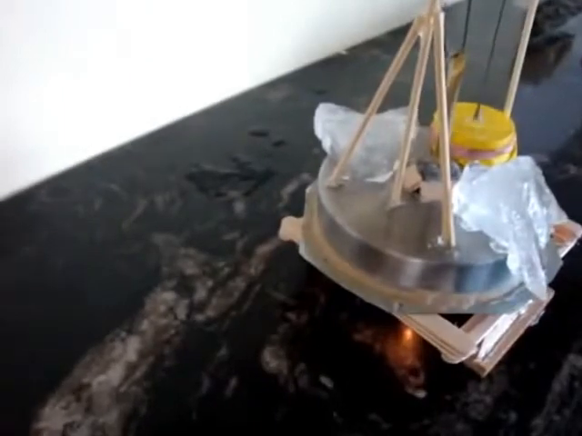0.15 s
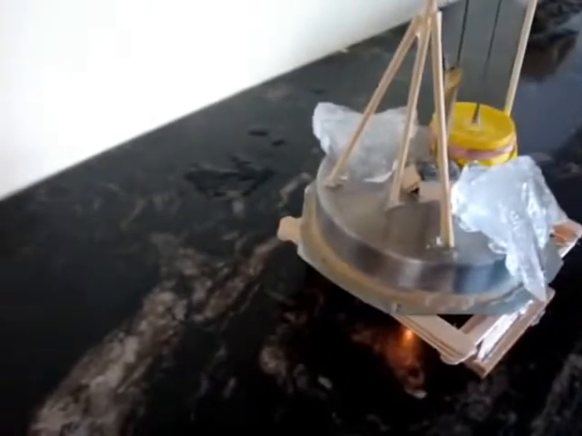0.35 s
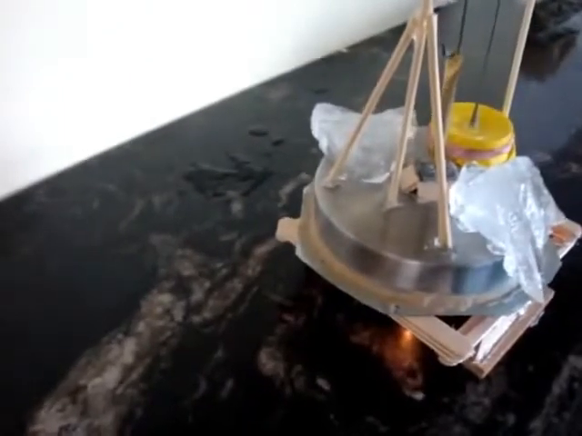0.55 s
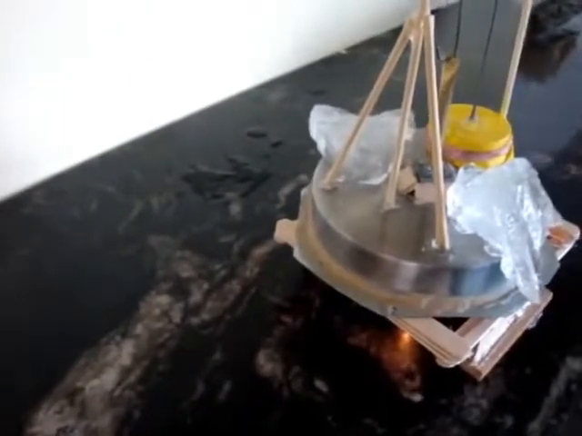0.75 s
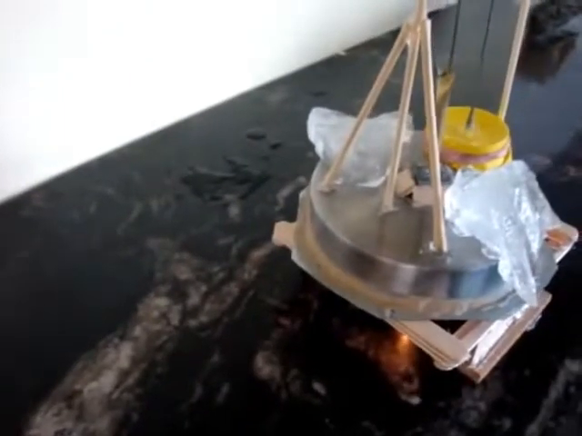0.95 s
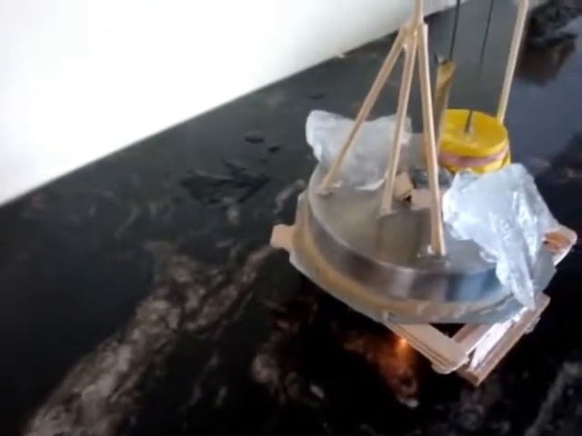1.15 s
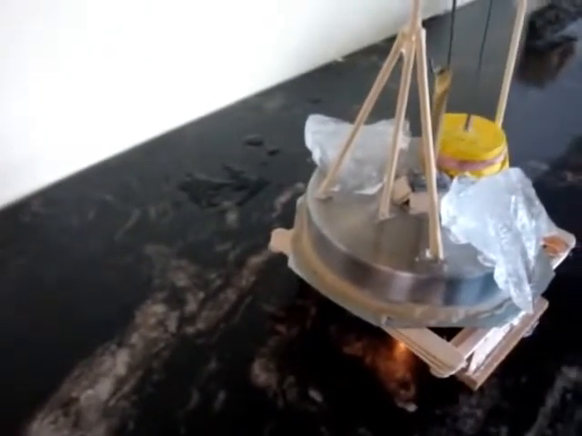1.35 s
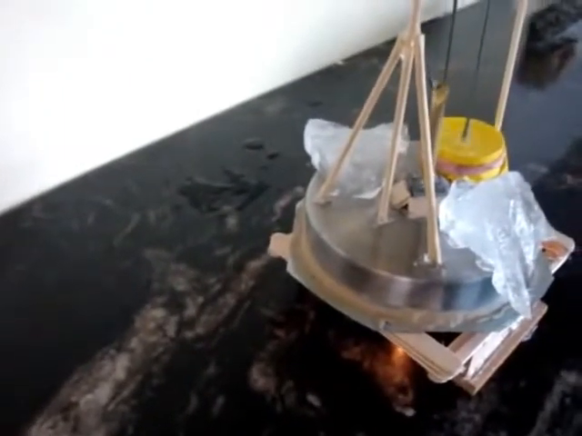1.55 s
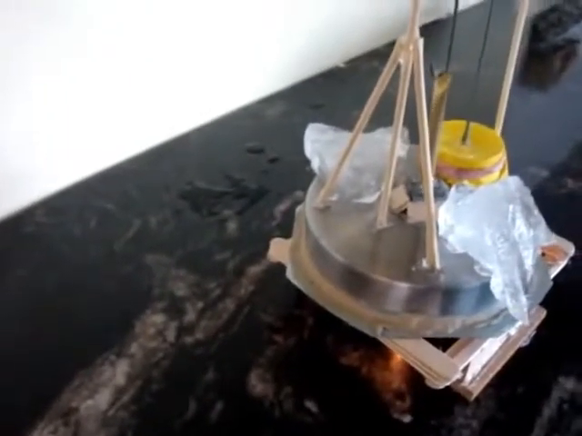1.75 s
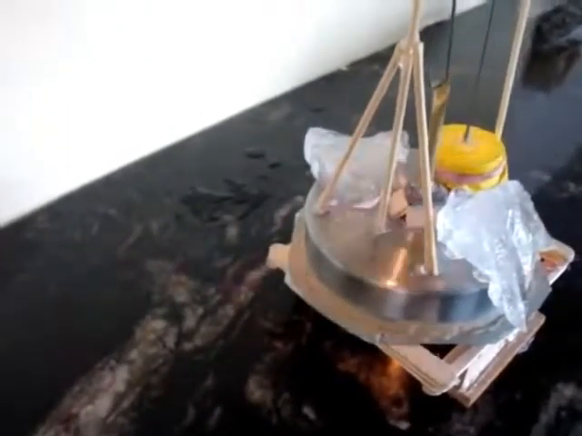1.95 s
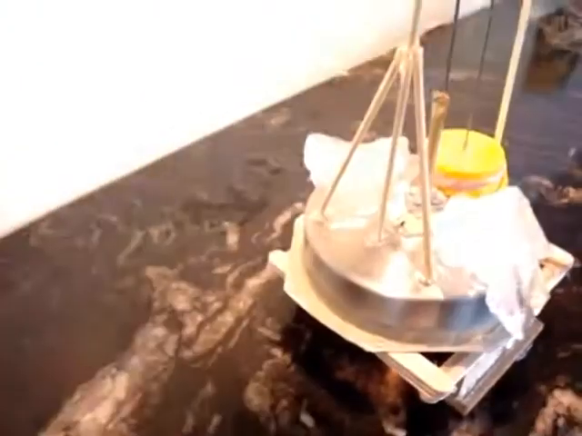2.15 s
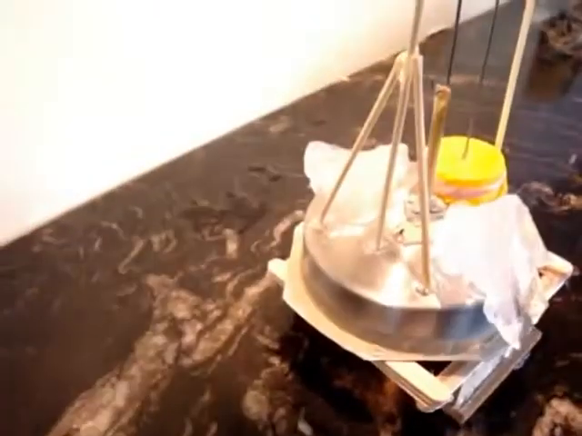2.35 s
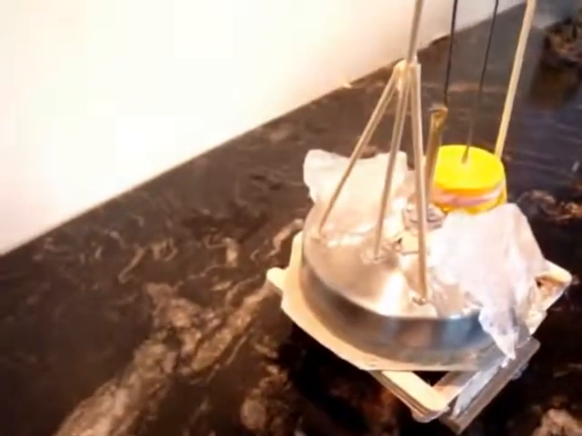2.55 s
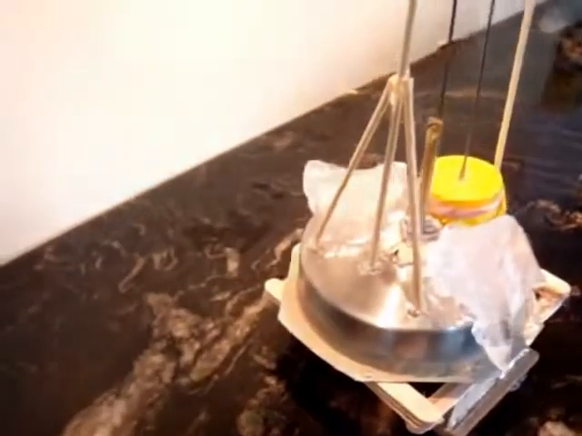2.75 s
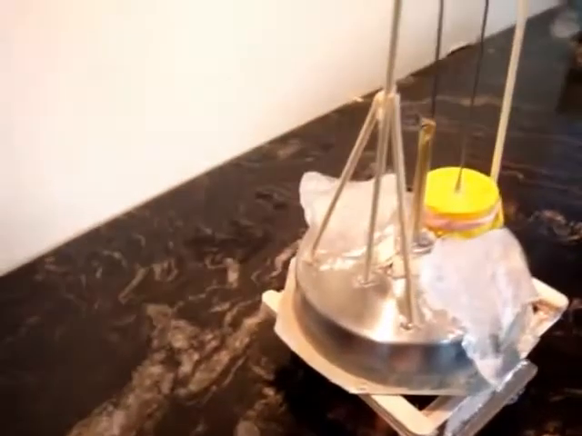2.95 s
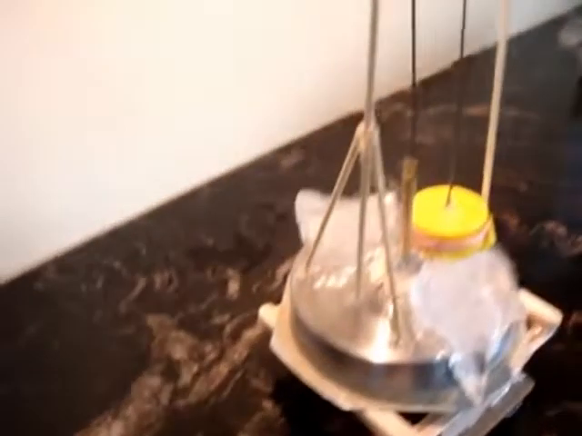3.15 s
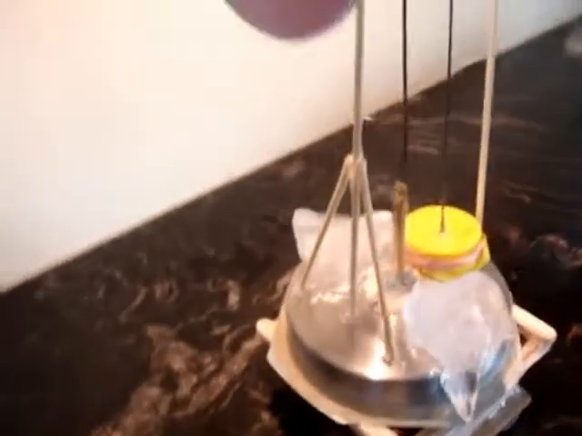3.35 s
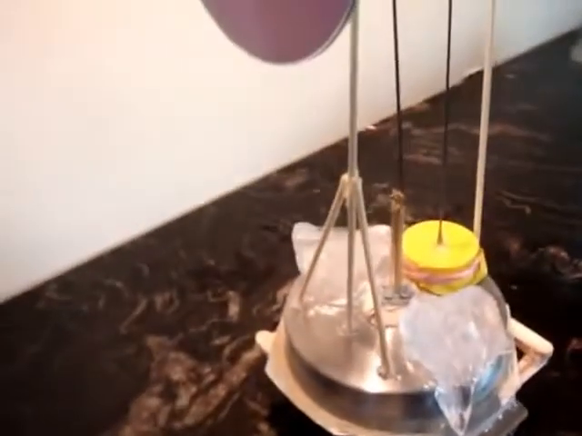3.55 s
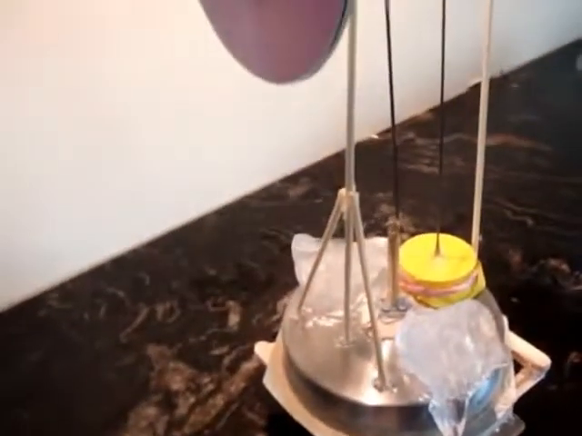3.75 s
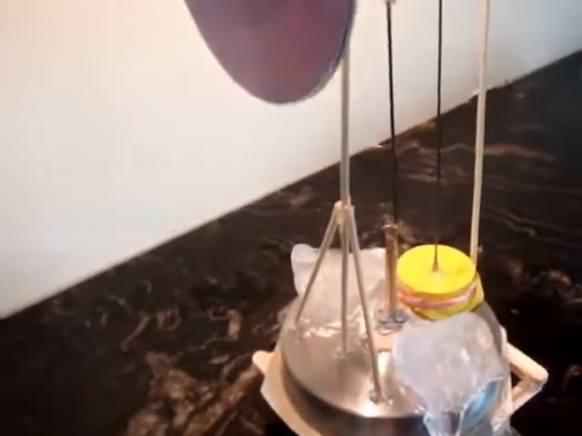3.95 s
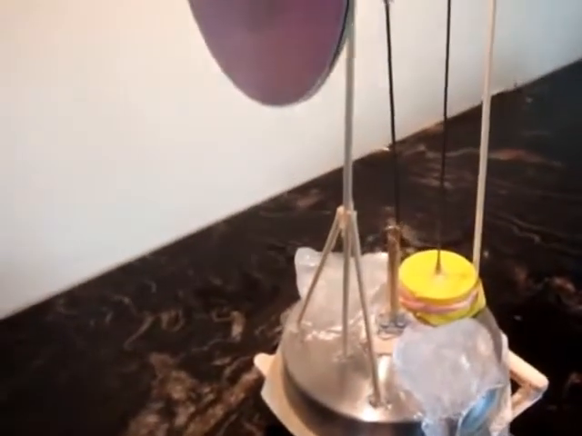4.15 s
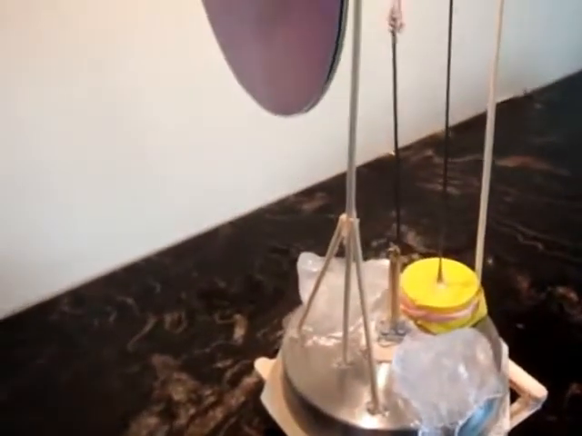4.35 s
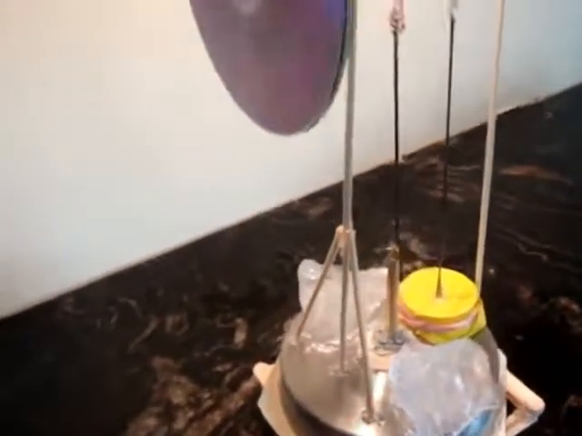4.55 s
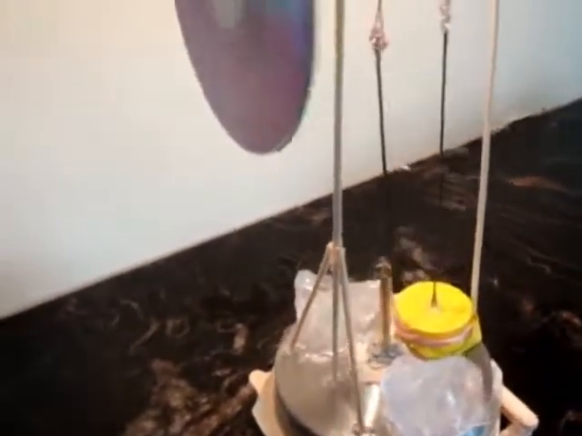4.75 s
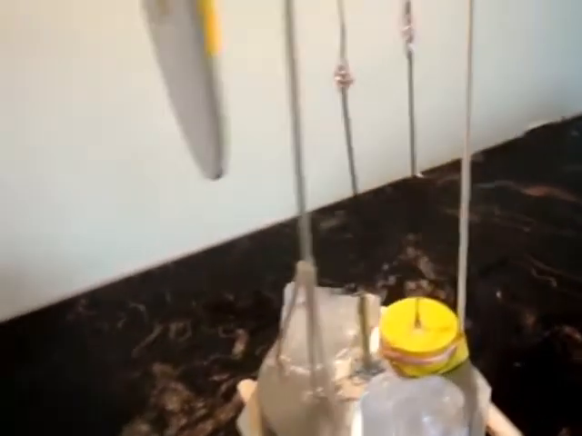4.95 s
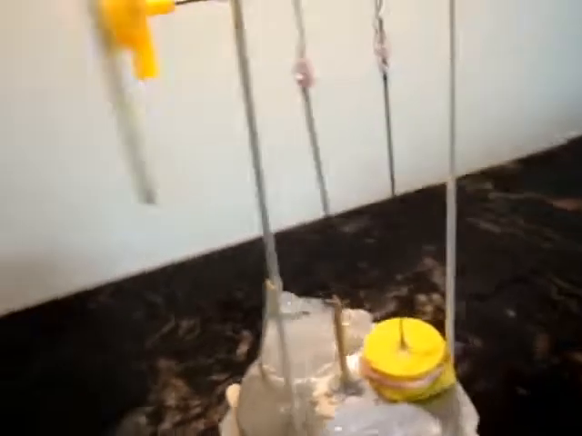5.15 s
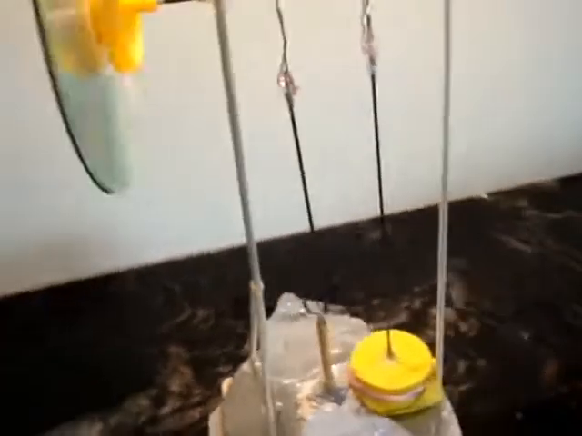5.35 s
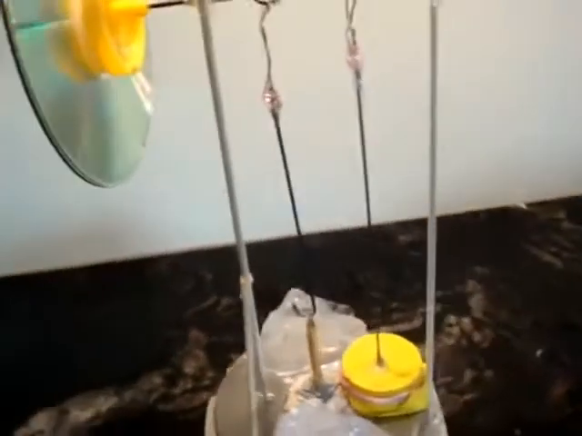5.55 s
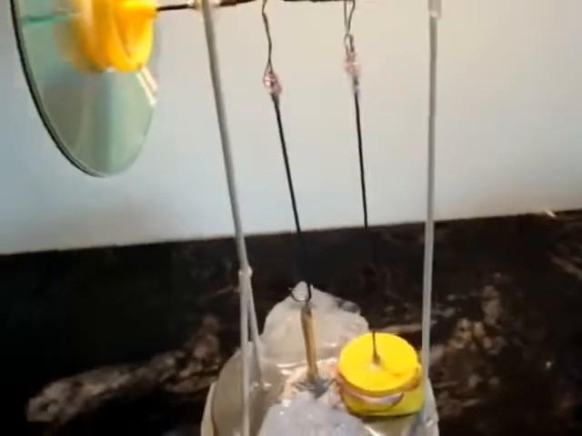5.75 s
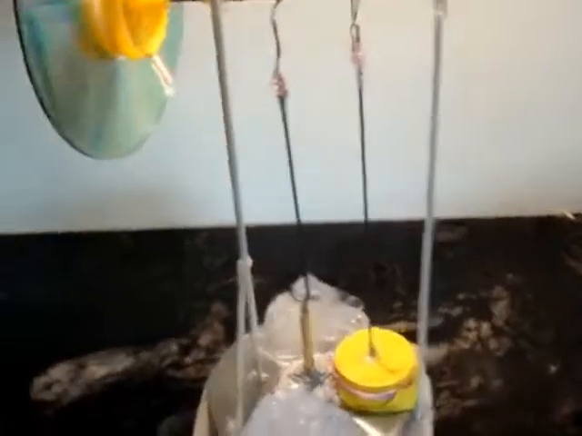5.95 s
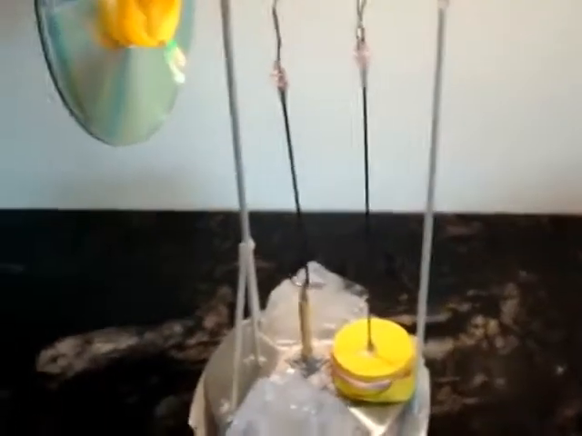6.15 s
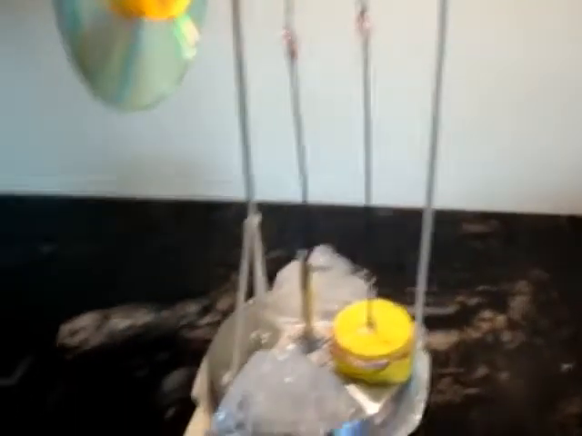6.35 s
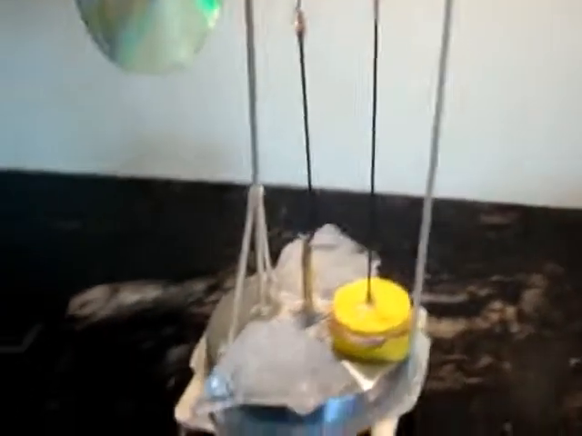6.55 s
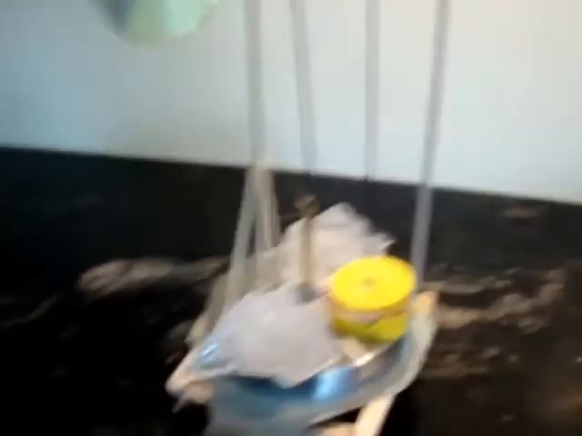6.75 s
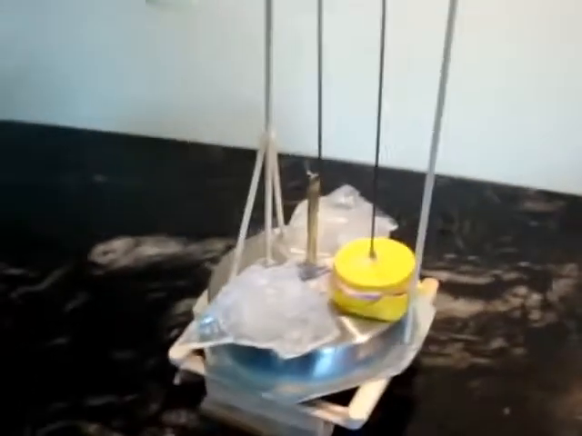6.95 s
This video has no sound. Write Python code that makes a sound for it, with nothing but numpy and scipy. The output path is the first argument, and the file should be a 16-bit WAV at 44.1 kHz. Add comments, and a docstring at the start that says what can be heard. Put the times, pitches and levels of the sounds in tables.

```python
"""Faint hiss and a fading low drone come first, then light touches on a tin can, rod chatter and a tick.
A small home-made hot-air engine turns on a stone counter in a quiet room: each turn the wire rods tick
in their loops and the displacer knocks the can, hard below and softly above. Once a light switch snaps.
Struck parts are sums of dying modes; rubbing, scrape, rattle and floor are shaped noise; the hum is
wavering sines; a sparse-tap room adds the echo."""
import sys
import numpy as np
from scipy import signal
from scipy.io import wavfile
from scipy.ndimage import uniform_filter1d

SR = 44100
rng = np.random.default_rng(int(sys.argv[2]) if len(sys.argv) > 2 else 0)


def put_to_file(sound):
    """Save the sound as 16-bit audio at rate SR, in the file named by the first command-line argument."""
    columns = np.atleast_2d(sound).T  # one column per channel
    safe = np.clip(columns, -1, 1)
    whole_steps = np.round(safe * 32767)
    wavfile.write(sys.argv[1], SR, whole_steps.astype(np.int16))


def amplitude_ratio(level_db):
    """Convert a level in decibels to the matching linear amplitude (field) ratio."""
    exponent = np.asarray(level_db, float) / 20
    return 10 ** exponent


N = 308700  # 7 s

# displacer landing on the can floor: start_s, level_db, brightness_db_per_octave
KNOCKS = [(0.532, -25.5, 0), (1.119, -28.5, 0.5), (1.7048, -28, -1.5), (2.289, -28, 1), (2.864, -26, -1),
          (3.4328, -28.5, -1.5), (3.9977, -29, 0), (4.5577, -27.5, -3), (5.116, -29, -2), (5.673, -30, 1),
          (6.233, -28.5, -0.5), (6.79, -30.5, 0.5)]
SNAP_S = 2.0016


def evened(x):
    """Scales to rms 1."""
    return x / np.sqrt(np.mean(x ** 2) + 1e-20)


def read(points, hz):
    """Interpolates (Hz, value) points on a log frequency axis."""
    point_hz, value = np.transpose(points)
    return np.interp(np.log(hz + 1), np.log(point_hz + 1), value)


def add(mix, start_s, sound):
    """Mixes a sound in at start_s, cut at the end of the mix."""
    part = mix[round(start_s * SR):][:len(sound)]
    part += sound[:len(part)]


def ring(hz, db, t60_s, rise_s):
    """Sum of exponentially dying modes with a short rise, peak 1."""
    t = np.arange(SR // 5)[:, None] / SR
    envelope = amplitude_ratio(db - 60 * t / np.maximum(t60_s, .002)) * (1 - np.exp(-t / rise_s))
    total = (envelope * np.sin(2 * np.pi * hz * t)).sum(1)
    return total / abs(total).max()


def noise(colour, patchy_db):
    """Noise of a given spectrum whose level drifts in small time-frequency patches, rms 1."""
    frames, hz = N // 256 + 5, np.fft.rfftfreq(1024, 1 / SR)
    real, imag, patches = rng.standard_normal((frames, 513, 3)).T
    patches = uniform_filter1d(patches, size=10, axis=0)  # across frequency
    patches = evened(uniform_filter1d(patches, size=8, axis=1))  # across time
    z = (real + 1j * imag) * amplitude_ratio(read(colour, hz)[:, None] + patchy_db * patches)
    return evened(signal.istft(z, nperseg=1024, noverlap=768)[1][:N])


def can():
    """Knocks and touches ring the same can modes with other weights; no two blows land quite alike."""
    # can modes: mode_hz, t60_s, knock_db, touch_db
    can_modes = [(386, 0.052, -5, -8), (427, 0.11, -12, -19), (630, 0.038, -10, 9.5), (673, 0.026, 9, -23),
                 (759, 0.11, -19, 2), (988.5, 0.057, -1, 6), (1008, .25, -30, 0), (1272, 0.032, 0.5, -7),
                 (1464, 0.054, -10.5, 3.5), (1735, 0.024, -5, 5.5), (1888, 0.018, -4, 10),
                 (2635, 0.018, -20, -38)]
    # lighter touches: start_s, level_db, favoured_hz
    taps = [(0.254, -36.5, 990), (0.442, -39.5, 595), (0.577, -48, 627), (0.8395, -33.5, 980),
            (1.026, -39, 622), (1.065, -42, 646), (1.158, -44, 620), (1.361, -46, 797), (1.4295, -35, 760),
            (1.616, -39, 600), (2.2, -38.5, 680), (2.509, -50, 1040), (2.593, -34.5, 940),
            (2.784, -41.5, 610), (3.165, -39.5, 754), (3.383, -41, 1280), (3.476, -45, 974),
            (3.732, -38.5, 750), (3.919, -43, 568), (4.2925, -37.5, 810), (4.479, -42.5, 706),
            (4.852, -37, 760), (5.409, -37.5, 754), (5.622, -36.5, 1360), (5.73, -46, 626),
            (5.967, -45.5, 730), (6.153, -40.5, 778), (6.5275, -38.5, 705), (6.716, -39.5, 655)]
    # contacts as the displacer settles: delay_s, level_db
    settle = [(0, 1), (.003, -10.5), (.0078, -10), (.017, -25)]
    mode_shift, settle_spread = .015, .24  # shares by which mode pitch and contact delay vary
    thud_db, thud_top_hz, thud_t60_s = -11, 1700, .04
    firm_tap_db, focus_per_db = -34, 2.5  # softer taps fall off (dB per octave) around favoured_hz

    out = np.zeros(N)
    hz, t60_s, knock_db, touch_db = np.transpose(can_modes)
    dull = signal.butter(4, [350, thud_top_hz], "band", fs=SR, output="sos")
    t = np.arange(2000) / SR
    for start_s, level_db, tilt in KNOCKS:
        weight, shift = rng.standard_normal((2, len(hz)))
        knock_hz = hz * (1 + mode_shift * shift)
        for delay_s, contact_db in settle:
            spot = rng.standard_normal(len(hz))  # each contact hits another spot
            colour_db = knock_db + tilt * np.log2(hz / 700) + 0.39 * weight + 1.5 * spot
            blow = ring(knock_hz, colour_db, t60_s, 0.0009)
            varied_s = delay_s * (1 + settle_spread * np.tanh(spot[0]))
            add(out, start_s + varied_s, -amplitude_ratio(level_db + contact_db) * blow)
        thud = signal.sosfilt(dull, rng.standard_normal(len(t))) * amplitude_ratio(-60 * t / thud_t60_s)
        add(out, start_s, amplitude_ratio(level_db + thud_db) * thud / abs(thud).max())
    for start_s, level_db, favoured_hz in taps:
        focus = focus_per_db * max(firm_tap_db - level_db, 0)
        chance = rng.standard_normal(len(hz))
        colour_db = touch_db - focus * abs(np.log2(hz / favoured_hz)) + 2.5 * chance
        add(out, start_s - .001, amplitude_ratio(level_db) * ring(hz, colour_db, t60_s, 0.0014))
    return out


def rods():
    """Short dry clicks with a rebound; bursts of tiny uneven contacts, which ring on only in a squeak."""
    # rods clicking in their loops: start_s, level_db, main_hz, rebound_db
    ticks = [(0.4775, -25.5, 3110, -12), (1.065, -28.5, 3070, -9), (1.6523, -25.5, 3130, -6),
             (2.2338, -28.5, 3110, -10), (2.804, -28, 2990, -19), (2.8132, -31, 3070, -10),
             (3.378, -30, 3180, -9), (3.945, -29, 3160, -9), (4.5073, -29, 3170, -9),
             (5.064, -28.5, 3230, -6), (5.6226, -32, 3190, -1), (6.1821, -31.5, 3230, -4),
             (6.737, -33.5, 3120, 1)]
    # rod modes besides the main ring: mode_hz, t60_s, level_db
    rod_modes = [(1350, 0.011, -12), (1830, 0.012, -5), (2250, 0.011, -8), (2800, .011, -6),
                 (3500, 0.011, -6), (3950, 0.009, -12), (4800, 0.006, -18), (5700, .005, -20)]
    # chatter as the slack runs out: start_s, peak_db, main_hz
    chatters = [(0.3955, -36.5, 3300), (0.4412, -40, 3400), (0.463, -39, 3220), (0.98, -40, 3500),
                (1.023, -41, 2240), (1.053, -41, 3100), (1.0993, -42, 2550), (1.354, -39, 2870),
                (1.615, -38, 3800), (1.626, -37, 2100), (1.826, -39.5, 2060), (2.195, -44, 2080),
                (2.2205, -41, 2960), (2.7915, -36.5, 3140), (3.3647, -43, 3170), (3.917, -39, 3600),
                (3.925, -37, 3110), (3.931, -38, 1900), (4.478, -40, 3130), (4.485, -38, 2000),
                (5.5916, -43, 3700), (6.215, -44, 3790), (6.529, -42, 3310), (6.7115, -39, 2770),
                (6.723, -38.5, 4200), (6.745, -40, 3000)]
    # brief squeak of a rod in its loop: start_s, peak_db, main_hz
    squeaks = [(6.1545, -38, 3730)]
    mode_shift, rebound_s, rebound_spread = .03, .0037, .039  # shift and spread are shares

    out = np.zeros(N)
    hz, t60_s, weight_db = np.transpose(rod_modes)
    for start_s, level_db, main_hz, rebound_db in ticks:
        chance, shift = rng.standard_normal((2, len(hz)))
        click_hz = np.r_[main_hz, hz * (1 + mode_shift * shift)]
        click_db = np.r_[0, weight_db + 2.5 * chance]
        click = ring(click_hz, click_db, np.r_[.011, t60_s], .0005)
        add(out, start_s, amplitude_ratio(level_db) * click)
        varied_s = rebound_s * (1 + rebound_spread * shift[0])
        add(out, start_s + varied_s, amplitude_ratio(level_db + rebound_db) * click)
    t = np.arange(2000) / SR
    stroke = np.exp(-(t / .005) ** 2)
    for table, main_db, main_t60_s in ((chatters, 0, .004), (squeaks, 12, .012)):
        for start_s, peak_db, main_hz in table:
            strength, chance = rng.standard_normal((2, len(t)))
            contacts = strength * (chance > 1.2) * stroke
            contacts[0] = 2  # a firm first contact
            contact = ring(np.r_[main_hz, hz], np.r_[main_db, .35 * weight_db],
                           np.r_[main_t60_s, .5 * t60_s], 0.0002)
            burst = signal.fftconvolve(contacts, contact)
            add(out, start_s, amplitude_ratio(peak_db) * burst / abs(burst).max())
    return out


def rubbing():
    """Grainy friction of the rods, its strength following the crank angle between knocks."""
    # rubbing through one turn: turn_share_after_knock, level_db
    rub = [(0, -62), (.15, -66), (.4, -72), (.55, -68), (.7, -68), (.85, -61), (.93, -64), (1, -64)]
    # rubbing spectrum: colour_hz, density_db_per_hz (relative)
    rub_colour = [(200, -43), (600, -23.5), (1200, -25), (2000, -18), (3200, -4), (5000, -5.5),
                  (10000, -12)]
    knock_s = np.transpose(KNOCKS)[0]
    # one more turn at either end
    knock_s = np.r_[2 * knock_s[0] - knock_s[1], knock_s, 2 * knock_s[-1] - knock_s[-2]]
    angle = np.interp(np.arange(N) / SR, knock_s, np.arange(len(knock_s))) % 1
    grain_db = 2.5 * evened(uniform_filter1d(rng.standard_normal(N), size=300))
    return amplitude_ratio(np.interp(angle, *np.transpose(rub)) + grain_db) * noise(rub_colour, 3.0)


def scrape():
    """Something slides on the can: uneven slips excite a few resonances."""
    # resonances: ring_hz, width_hz, level_db
    scrape_ring = [(780, 78, 4), (948, 8.9, -14), (1060, 63, 0.5), (1170, 43, -4), (1880, 160, -23)]
    start_s, hold_s, slips_per_s = 5.128, .048, 1200
    level_db, release_db_per_s = -43, -500
    slips = rng.standard_normal(N) * (rng.random(N) < slips_per_s / SR)
    hz, width_hz, db = np.transpose(scrape_ring)
    since_s = np.arange(N) / SR - start_s
    stroke_db = level_db + release_db_per_s * np.maximum(since_s - hold_s, 0)
    resonance = ring(hz, db, 0.85 / width_hz, 0.00054)
    return (since_s > 0) * amplitude_ratio(stroke_db) * evened(signal.oaconvolve(slips, resonance)[:N])


def switch():
    """The rocker lands and bounces a few times, ringing the housing modes."""
    # landings: delay_s, level_db
    bounces = [(0, 5.5), (.0025, 7.5), (.0039, 6), (.0075, -7), (.012, -15)]
    # housing modes: mode_hz, level_db, t60_s
    housing = [(61, -47, 0.027), (173, -38, 0.056), (516, -42, 0.03), (674, -33, 0.034), (800, -7, 0.042),
               (1040, -15, 0.015), (1200, -17, 0.021), (1486, -23, 0.046), (1900, -25, .025),
               (2287, -16.5, 0.034), (2520, -13, 0.027), (3310, -10.5, 0.029), (3276, -8, 0.026),
               (3645, -9, 0.026), (3910, -6, 0.015), (3900, -5.5, 0.017), (4540, -10, 0.018),
               (4450, -18, .018)]
    snap_db = -16  # added to each landing
    out = np.zeros(N)
    hz, weight_db, t60_s = np.transpose(housing)
    for delay_s, level_db in bounces:
        colour_db = weight_db + 1.2 * rng.standard_normal(len(hz))
        add(out, SNAP_S + delay_s, amplitude_ratio(snap_db + level_db) * ring(hz, colour_db, t60_s, 0.0006))
    return out


def switch_rattle(colour, level_db):
    """A dense burst of spring and contacts inside the snap, each band dying at its own speed."""
    # decay: band_hz, t60_s
    rattle_t60 = [(500, 0.032), (2000, 0.12), (4000, 0.054), (7000, 0.051), (10000, 0.025)]
    out = np.zeros(N)
    hz, t, z = signal.stft(rng.standard_normal(SR // 8), SR, nperseg=128, noverlap=96)
    z *= amplitude_ratio(read(colour, hz)[:, None] - 60 * t / read(rattle_t60, hz)[:, None])
    burst = signal.istft(z, SR, nperseg=128, noverlap=96)[1]
    add(out, SNAP_S, amplitude_ratio(level_db) * burst / np.std(burst[:400]))
    return out


def room(x):
    """Sparse random-sign taps, each band dying at its own speed: a quick part and a slower, fainter one."""
    # decay of the quick part: band_hz, t60_s
    room_t60 = [(300, 0.27), (800, 0.29), (2100, 0.75), (4000, 0.36), (6000, 0.28), (9000, 0.23)]
    taps, at = np.zeros(SR // 2), np.arange(400, SR // 2 - 20, 20)
    taps[at + rng.integers(0, 20, len(at))] = rng.choice([-1., 1.], len(at))
    hz, t, z = signal.stft(taps, SR, nperseg=256)
    fall_db = -60 * t / read(room_t60, hz)[:, None]
    z *= amplitude_ratio(fall_db) + amplitude_ratio(-26.5 + 0.3 * fall_db)
    tail = signal.istft(z, SR, nperseg=256)[1]
    return signal.fftconvolve(x, tail / np.linalg.norm(tail))[:N]


def background():
    """Microphone hiss whose treble flickers, wandering low mids that swell, and a fading rumble and hum."""
    # hiss spectrum: colour_hz, density_db_per_hz (relative)
    floor = [(15, -50), (25, -37), (54, -22), (141, -19), (233, 3.5), (307, -4.5), (366, -19), (620, -2),
             (1100, -5), (1350, -4), (2230, -5.5), (8220, -13), (10000, -16), (13100, -67.5), (22000, -120)]
    floor_db, hiss_db_per_s = -53.8, -0.29
    mids_start_db, mids_db_per_s, mids_wander_db = -57, 0.4944, 0.67
    rumble_start_db, rumble_rest_db, rumble_fall_s = -63, -67, 1.5
    hum_peak_db, hum_peak_s, hum_db_per_s = -61, 0.26, -5.5  # falls to both sides of its peak

    t = np.arange(N) / SR
    hiss = amplitude_ratio(floor_db + hiss_db_per_s * (t - t.mean())) * noise(floor, 1.5)
    treble = signal.sosfilt(signal.butter(2, 5500, "high", fs=SR, output="sos"), hiss)
    flicker = amplitude_ratio(2.0 * evened(uniform_filter1d(rng.standard_normal(N), size=1200)))
    mids = noise([(150, -54.5), (280, 1.5), (650, 1.0), (1200, -6.0), (3000, -41.5)], 1.2)
    wander = evened(uniform_filter1d(rng.standard_normal(N), size=9000))
    mids_db = mids_start_db + mids_db_per_s * t + mids_wander_db * wander
    rumble = noise([(40, -13.5), (80, -5.5), (125, 5.0), (200, 6.0), (400, -31.0), (2000, -80)], 0.72)
    rumble_db = rumble_rest_db + (rumble_start_db - rumble_rest_db) * np.exp(-t / rumble_fall_s)
    hum_db = hum_peak_db + hum_db_per_s * abs(t - hum_peak_s)
    drone = amplitude_ratio(rumble_db) * rumble + amplitude_ratio(hum_db) * hum()
    return hiss + (flicker - 1) * treble + amplitude_ratio(mids_db) * mids + drone


def hum():
    """Low sine tones, each wavering a little in pitch."""
    # tones: pitch_hz, level_db, waver_hz (rms)
    tones = [(86, -11.5, 1.46), (124, -0.5, 1.8), (139, -3.5, 2), (185.5, -3.5, 2.3), (248, -4, 1.6)]
    wander = rng.standard_normal((len(tones), N))
    wander = evened(uniform_filter1d(wander, size=6000, axis=1))
    out = np.zeros(N)
    for (pitch_hz, level_db, waver_hz), drift in zip(tones, wander):
        phase = 2 * np.pi * np.cumsum(pitch_hz + waver_hz * drift) / SR
        out += amplitude_ratio(level_db) * np.sin(phase)
    return out


def scene():
    """All sources reach one microphone; small struck things radiate no deep bass."""
    # rattle spectrum, direct: colour_hz, density_db_per_hz (relative)
    rattle_colour = [(200, -52), (450, -37), (750, -6.5), (1200, -7), (2000, -25), (2700, -23), (3200, -9),
                     (4300, -9.5), (5000, -19), (7500, -18.5), (9500, -15.5), (10500, -41)]
    # snap spectrum as the walls return it: colour_hz, density_db_per_hz (relative)
    returned_colour = [(180, -51), (300, -24), (385, 4), (814, 4), (1120, -10), (1900, -16.5), (2700, -12),
                       (3200, -4), (4400, -3.5), (5200, -10), (10000, -16), (13000, -46), (22000, -120)]
    rattle_db, returned_rattle_db = -21, -31.5
    can_send_db, rods_send_db, snap_send_db = -11.5, -21, -41  # into the room

    no_bass = signal.butter(2, 220, "high", fs=SR, output="sos")
    tin = signal.sosfilt(no_bass, can() + scrape())
    wires = signal.sosfilt(no_bass, rods())
    snap = switch()
    no_lows = signal.butter(3, 400, "high", fs=SR, output="sos")
    rattle = signal.sosfilt(no_lows, switch_rattle(rattle_colour, rattle_db))
    engine_send = amplitude_ratio(can_send_db) * tin + amplitude_ratio(rods_send_db) * wires
    switch_send = amplitude_ratio(snap_send_db) * snap + switch_rattle(returned_colour, returned_rattle_db)
    echo = room(engine_send + switch_send)
    mono = tin + wires + snap + rattle + echo + rubbing() + background()
    return np.array([mono, mono])


def roll_off(x):
    """The treble ends steeply here."""
    return signal.sosfilt(signal.butter(12, 10200, fs=SR, output="sos"), x)


def record(dry):
    """Steep low-pass at 10.07 kHz ends the band."""
    edge = signal.firwin(511, 10070, window=("kaiser", 8), fs=SR)
    mix = signal.oaconvolve(dry, edge[None], "same")
    return roll_off(mix)


dry = scene()
out = record(dry)
put_to_file(out)
```